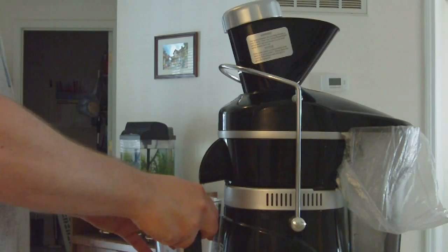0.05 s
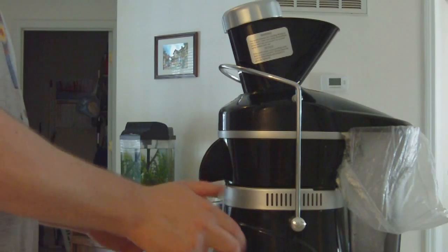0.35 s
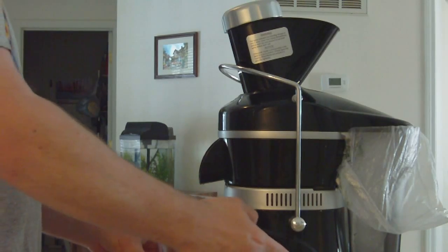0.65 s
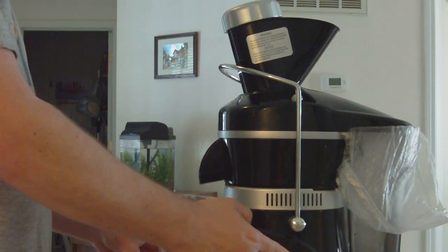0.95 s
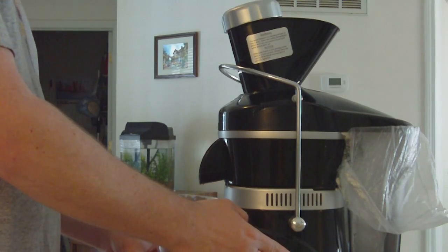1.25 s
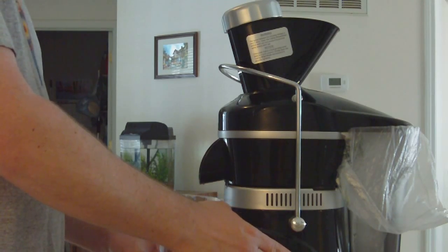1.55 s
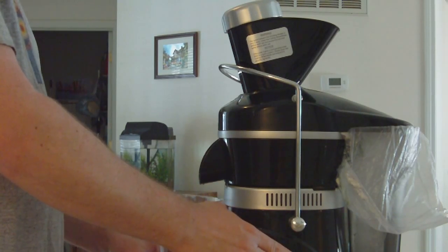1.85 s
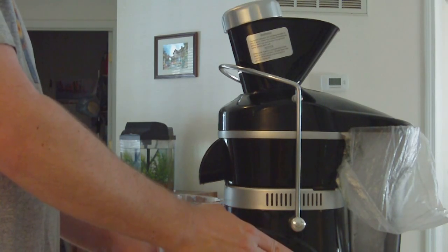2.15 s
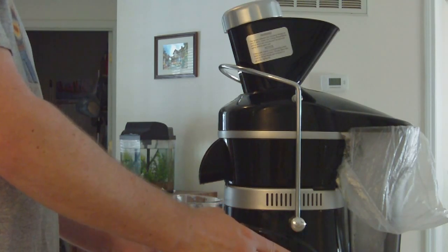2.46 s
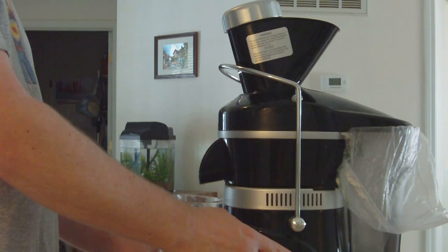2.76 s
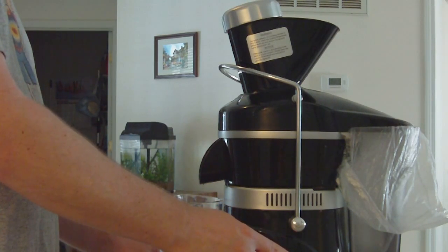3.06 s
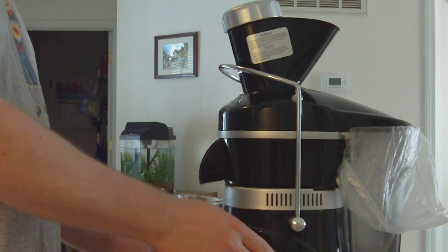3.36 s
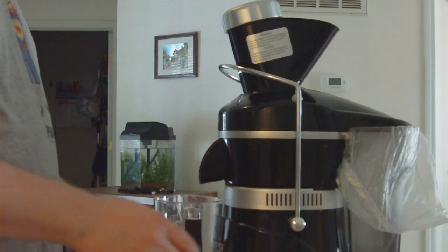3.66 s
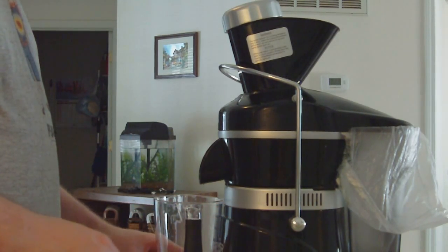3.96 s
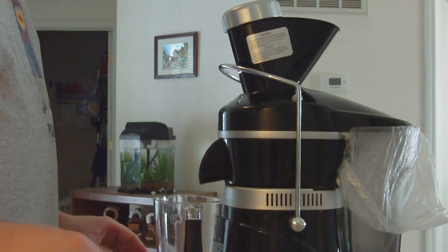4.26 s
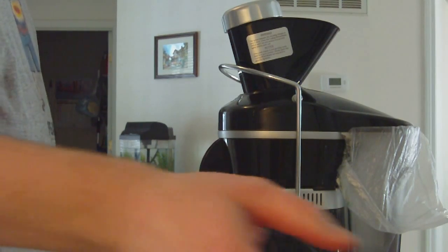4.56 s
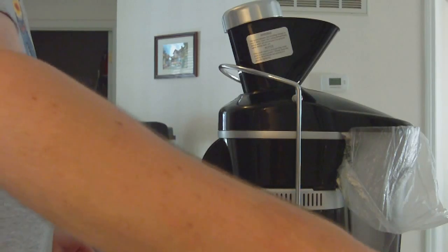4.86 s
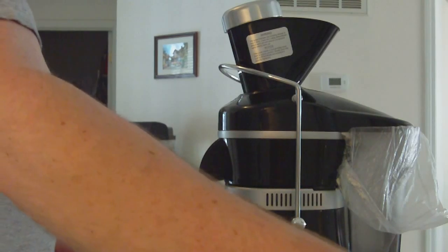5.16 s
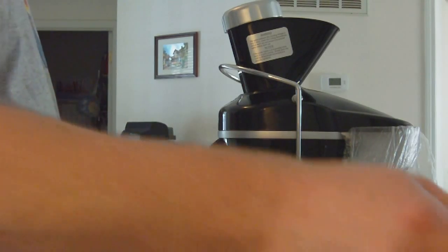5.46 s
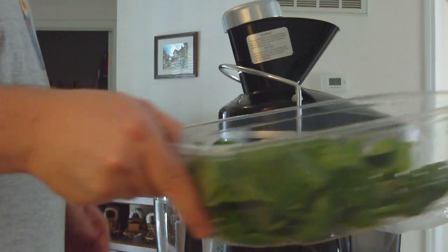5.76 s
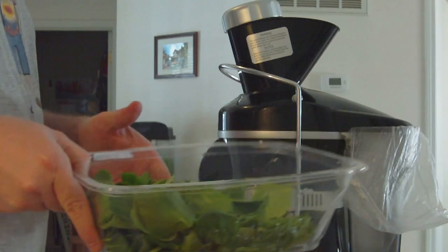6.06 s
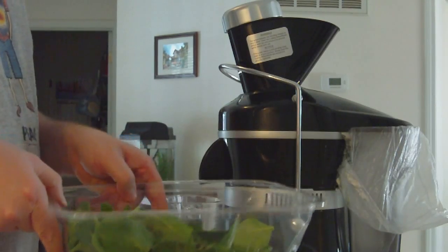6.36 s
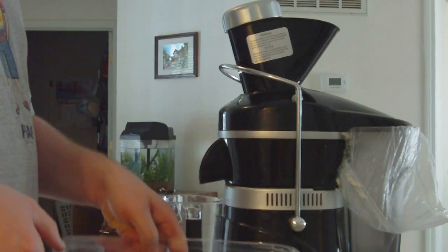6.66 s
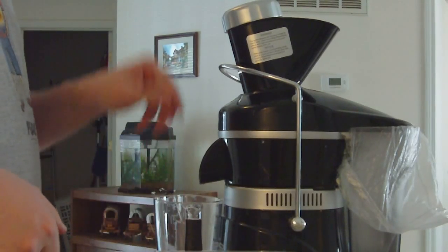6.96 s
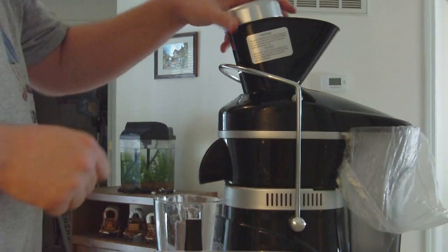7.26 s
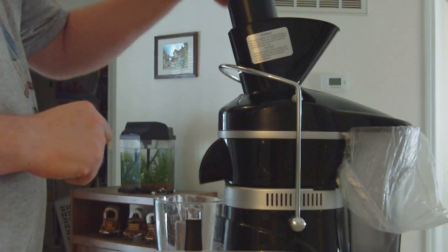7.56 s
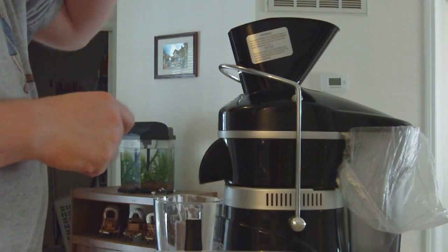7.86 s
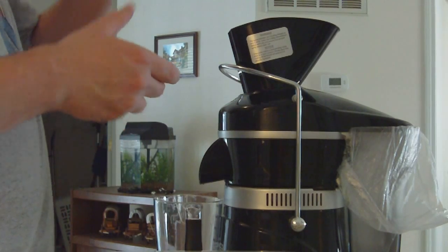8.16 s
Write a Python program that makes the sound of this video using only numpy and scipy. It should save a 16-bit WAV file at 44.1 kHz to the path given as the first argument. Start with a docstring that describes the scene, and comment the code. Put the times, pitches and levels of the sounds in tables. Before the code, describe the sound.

In a quiet kitchen, a jug knocks a few times into place. After a pause a switch snaps and a juicer motor groans up to speed, settling into a steady whir of hum, whine, rushing air and light rattle, with brief scraping at first. Near the end a plastic tub bumps onto the counter and the pusher rubs and knocks out of the chute. One small microphone picks it up from nearby.

```python
"""A centrifugal juicer in a quiet kitchen, heard from nearby on one small microphone.
A jug is knocked into place. At 2.2 s the switch snaps and the induction motor groans up through the
resonances of its housing to just under 60 turns a second. It runs on with hum, whine, rushing air and a
light rattle, the basket grazing the lid at first. An arm, then a plastic tub, passes between machine and
microphone; at 6.7 s the tub is set down, and by 7.6 s the pusher is drawn out of the chute."""
import sys
import numpy as np
from scipy import signal
from scipy.fft import rfft, irfft, next_fast_len
from scipy.io import wavfile
from scipy.ndimage import uniform_filter1d, map_coordinates

SR = 44100
rng = np.random.default_rng(int(sys.argv[2]) if len(sys.argv) > 2 else 0)


def dump(signal):
    """Clip the signal to [-1, 1] and save it as 16-bit WAV at the path in sys.argv[1]."""
    limited = np.clip(np.atleast_2d(signal).T, -1, 1)
    pcm = np.round(limited * 32767).astype(np.int16)
    wavfile.write(sys.argv[1], SR, pcm)


N = 362061
TIME = np.arange(N) / SR
GRIP_S, PUSHER_OUT_S = 6.9, 7.63

# the motor gathers speed: time_s, speed_hz
SHAFT_SPEED = [(2.162, 1), (2.35, 26), (2.58, 32.5), (2.625, 37.5), (2.645, 47.5), (2.72, 56),
               (2.8, 59.815)]
FULL_SPEED_S, FULL_SPEED_HZ = SHAFT_SPEED[-1]

def shaft():
    """The turning shaft: its angle in radians and its pace as a share of full speed."""
    speed = curve(SHAFT_SPEED) * (TIME > SHAFT_SPEED[0][0])
    angle = 2 * np.pi * np.cumsum(speed * (1 + 0.00018 * drift(2))) / SR
    return angle, speed / FULL_SPEED_HZ


# resonances of the housing and of the metal basket: pitch_hz, width_hz, level_db
HOUSING_MODES = [(530, 59, 0), (673, 190, -6), (920, 114, -1), (1110, 65, -4.5), (1240, 90, -15)]
BASKET_MODES = [(1692, 130, 1.5), (1930, 70, -7), (2013, 50, 3), (2470, 130, 0), (3000, 140, 0),
                (3350, 110, -1), (3690, 89, -3.5)]
# shudders of the housing and squeals of the basket: peak_s, half_length_s, level_db
HOUSING_SHUDDERS = [(2.25, 0.045, -34), (2.372, 0.045, -27.5), (2.447, 0.017, -21.5), (2.51, 0.038, -17.5),
                    (2.587, 0.04, -16.5), (2.672, 0.056, -17)]
BASKET_SQUEALS = [(2.646, 0.0087, -20), (2.684, 0.015, -24.5), (2.675, 0.063, -29.5)]

def run_up(angle, slots=18, sideband_db=-7, scrape_db=4):
    """The motor's slot tone, its sidebands and its multiples sweep through housing and basket."""
    def swept(drive, modes):
        drive = unit(drive) + amp(scrape_db) * rng.standard_normal(N)
        rung = colour(drive, lambda hz: resonances(modes, hz))
        return rung / np.sqrt(abs(uniform_filter1d(rung ** 2, size=900)) + 1e-9)  # level held even
    angle = angle + .035 * drift(45)  # the shaft judders under the starting torque
    sidebands = sum(np.cos((slots + k) * angle + 2 * np.pi * rng.random())
                    for k in (-2, -1, 1, 2, 4, 6, 9, 12))
    groan = swept(np.cos(slots * angle) + amp(sideband_db) * sidebands, HOUSING_MODES)
    squeal = swept(sum(np.cos(k * slots * angle) / (k - 1) for k in range(2, 5)), BASKET_MODES)
    shudder = surges(HOUSING_SHUDDERS)
    return groan * shudder + squeal * (surges(BASKET_SQUEALS) + amp(-23) * shudder)


# tones locked to the shaft: multiple (rounded when played), pusher_in_db, chute_open_db
SHAFT_ORDERS = [(4, -49.5, -44.5), (5, -52.5, -50), (6, -55, -59), (7, -57, -63), (8, -53, -49),
                (9, -44.5, -43), (10, -44, -43), (11, -60.5, -62), (12, -63.5, -56), (13, -52.5, -53),
                (15, -47, -46), (16, -58, -53), (18, -52, -56), (20, -51, -52), (22, -50, -56),
                (23, -62.5, -50), (26, -51, -58), (70, -67.5, -59), (69.1, -56.5, -53), (70.9, -59, -55),
                (71.73, -46.5, -47.5), (73.3, -57, -54)]
# the bearings at full speed: pitch_hz, level_db
BEARING_WHINE = [(3148, -64), (3170, -58.5), (3188, -47.5), (3226, -41), (3263, -46), (3286, -49),
                 (3333, -51), (3810, -52)]

def motor_tones(angle, pace):
    """Shaft orders and bearing whine, each wavering in strength and phase."""
    def tone(phase, depth, rate_hz):
        wavering = (1 + depth * drift(rate_hz)) * np.cos(phase)
        return np.sqrt(2) * (wavering + depth * drift(rate_hz) * np.sin(phase))
    opened = chute_open()
    _, shade_db = shade()
    orders = sum((amp(shut_db) * (1 - opened) + amp(open_db) * opened) * tone(round(k) * angle, .2, 9)
                 for k, shut_db, open_db in SHAFT_ORDERS)
    whine = sum(amp(db) * tone(hz / FULL_SPEED_HZ * angle, 0.31, 14) for hz, db in BEARING_WHINE)
    return (orders + whine * amp(shade_db)) * pace ** 4


# resonances of the lid and of the panels: pitch_hz, width_hz, level_db
LID_MODES = [(199, 29, -11), (242.7, 34, -6.5), (262.4, 20, 1.5), (298.4, 39, -1), (350, 49, -11)]
PANEL_MODES = [(538, 80, 0.5), (608, 87, -5), (849, 57, 0), (916, 54, -2), (982, 52, -1), (1120, 61, -2.5),
               (1364, 92, -4), (1517, 90, -6), (1686, 100, -6.5), (1970, 150, -12), (2540, 170, -13.5),
               (3470, 370, -13.5), (3790, 66, -13.5), (4470, 220, -17.5), (5380, 110, -16)]
# the broad part of the rattle: frequency_hz, density_db
RATTLE_SPECTRUM = [(100, -34), (400, 0), (800, 0.5), (1250, -9), (2500, -7), (3600, -10.5), (5000, -23),
                   (7000, -33)]
# how hard the basket rattles: time_s, strength_db
BASKET_SHAKING = [(2.85, -31), (3.05, -30), (3.78, -31.5), (3.83, -33), (4.66, -32), (4.68, -29.5),
                  (4.89, -32.5), (4.93, -27.5), (4.98, -31), (6.0, -30.5), (6.47, -34.5), (6.53, -29),
                  (6.6, -32), (6.97, -35), (7.59, -29.5), (7.688, -33.5), (8.018, -36.5), (8.17, -37.5)]

def basket_rattle(angle, pace, usual_db=-31, lid_db=-36, panels_db=-32, draw_db=5.5):
    """The spinning basket shakes lid and panels; the lid drums louder while the pusher is drawn up."""
    drum = colour(rng.standard_normal(N), lambda hz: resonances(LID_MODES, hz))
    taps = rng.standard_normal(N) * amp(3 * drift(300) + 0.55 * drift(12))  # grain and flutter
    taps *= 1 + 0.071 * np.cos(angle)  # a throb on each turn
    rattle = colour(taps, lambda hz: np.hypot(resonances(PANEL_MODES, hz),
                                              amp(-8.5 + spectrum(RATTLE_SPECTRUM, hz))))
    shaking_db = curve(BASKET_SHAKING) - usual_db
    drawn = np.clip((TIME - GRIP_S) / (PUSHER_OUT_S - GRIP_S), 0, 1) * (1 - chute_open())
    lid_gain = amp(lid_db + 0.46 * shaking_db + draw_db * drawn) * pace ** 0.46
    panel_gain = amp(panels_db + 1.5 * shaking_db) * pace ** 1.3
    return drum * lid_gain + rattle * np.hypot(panel_gain, amp(-10.5) * surges(HOUSING_SHUDDERS))


# air at the spout: frequency_hz, density_db
AIR_SPECTRUM = [(20, -3), (60, 2), (130, 2), (200, 2), (420, 3.5), (700, 7.5), (1800, 4), (3400, 4.5),
                (4400, 3), (5600, -0.5), (6300, 0.5), (7000, -7)]

def air_rush(angle, pace, level_db=-31, ease_db_per_s=0.45):
    """The basket fans air through the spout; the rush eases as the machine runs on."""
    pulsing = rng.standard_normal(N) * (1 + 0.049 * np.cos(angle))
    air = colour(pulsing, lambda hz: amp(spectrum(AIR_SPECTRUM, hz)))
    shade_db, _ = shade()
    return air * amp(level_db + shade_db - ease_db_per_s * (TIME - FULL_SPEED_S)) * pace ** 3.6


def unbalance(angle, level_db=-39.5, start_s=2.74, build_s=.17):
    """The off-centre basket hums at the shaft rate, dips as the pusher comes free, then stays stronger."""
    build = 1 - np.exp(-np.maximum(TIME - start_s, 0) / build_s)
    db = level_db - 12 * swell(PUSHER_OUT_S, .05) + 2 * chute_open()
    return np.sqrt(2) * build * amp(db) * np.cos(angle)


def windings(angle, pace, hum_hz=120.06, in_step_s=5.8, mains_db=-46, shaft_db=-49, open_db=-5.5):
    """Hum at twice the mains rate; the rotor slips, so its second order beats slowly against it."""
    mains = np.cos(2 * np.pi * hum_hz * (TIME - in_step_s) + 2 * angle[round(in_step_s * SR)])
    hum = amp(mains_db) * mains * (pace > 0) + amp(shaft_db) * np.cos(2 * angle) * pace ** 4
    return hum * amp(open_db * chute_open())


# spells of the basket touching the lid: start_s, end_s, level_db
GRAZE_SPELLS = [(3.034, 3.34, -31.5), (3.402, 4.403, -45.5)]

def graze(angle, decay_turns=0.22, attack_s=.006, release_s=.04):
    """The basket scrapes the lid once a turn for as long as a spell lasts."""
    out, noise = np.zeros(N), contact_noise(hardness=0.77, count=N)
    for start, end, db in GRAZE_SPELLS:
        turns = (angle - angle[round(start * SR)]) / (2 * np.pi)
        spell = np.clip((TIME - start) / attack_s, 0, 1) * np.exp(-np.maximum(TIME - end, 0) / release_s)
        out += amp(db) * spell * unit(noise * np.exp(-(turns % 1) / decay_turns) * (angle > 0))
    return out


def chute_open(opening_s=.05):
    """0 while the pusher is in the chute, 1 once it is out."""
    return np.clip((TIME - PUSHER_OUT_S) / opening_s, 0, 1)


# an arm, then the tub, passes in front of the microphone: peak_s, half_length_s, air_db, whine_db
PASSING_SHADOWS = [(5.02, .5, -2, -5), (6.1, 0.18, -0.6, -6.5)]

def shade():
    """Dips in dB of the air and of the whine while something screens the machine."""
    return sum(np.outer([air_db, whine_db], swell(s, half_length))
               for s, half_length, air_db, whine_db in PASSING_SHADOWS)


# knocks and clicks at the machine: start_s, level_db, hardness, rise_s, decay_s, room_db, crack_db
KNOCKS = [(.087, -13.5, 0.19, 0.0017, 0.0084, -10, -23), (0.185, -17.5, 0.57, 0.00081, 0.018, -9, -1),
          (.303, -17.5, 0.12, 0.0016, 0.023, -5, -16), (.401, -41, 0.53, 0.0018, 0.0089, -10, -18),
          (.445, -42, 0.5, 0.0016, 0.017, -14, -11), (2.161, -8.5, 0.99, 0.0037, 0.0082, -5, -12),
          (2.448, -24.5, 0.5, 0.0029, 0.0068, -18, -8), (5.23, -28.5, 1, 0.0018, .005, -18, -11),
          (7.426, -26, 0.96, .002, 0.0087, -16, -11)]
# the struck housing: pitch_hz, level_db, t60_s
HOUSING_RING = [(313, -22, .1), (563, 4, 0.27), (724, 1, 0.097), (823, 8, 0.084), (1233, -4, 0.14)]

def knocks(room_t60_s=0.38, ring_db=-7, crack_s=0.0032):
    """Each knock is a hard crack, a short burst, a ring of the housing and the kitchen's tail."""
    out, t = np.zeros(N), np.arange(SR // 2) / SR
    ring = sum(amp(db - 60 * t / t60) * np.sin(2 * np.pi * hz * t) for hz, db, t60 in HOUSING_RING)
    for s, db, hardness, rise, decay, room_db, crack_db in KNOCKS:
        crack = contact_noise(1.0, len(t)) * amp(crack_db) * np.exp(-t / crack_s)
        burst = contact_noise(hardness, len(t)) * np.exp(-np.maximum(t - 2 * rise, 0) / decay)
        tail = contact_noise(hardness, len(t)) * amp(room_db - 60 * t / room_t60_s)
        body = burst + tail + (1 - hardness) * amp(ring_db) * ring
        add(out, s, amp(db) * (crack + np.minimum(t / rise, 1) * body))
    return out


# the thin tub on the counter, the pusher in the chute: start_s, level_db, decay_s
TUB_HITS = [(6.665, -19, 0.019), (6.777, -20.5, 0.035), (6.797, -24.5, 0.019), (6.836, -25.5, 0.019)]
PUSHER_HITS = [(7.426, -22, 0.012), (7.512, -27.5, .014), (7.532, -30, 0.013), (7.592, -26, 0.012),
               (7.615, -25, 0.012)]
# the hollow tub, the chute's air column and wall: pitch_hz, width_hz, level_db
TUB_MODES = [(111, 110, -8), (328, 110, -2.5), (856, 130, 2.5), (1500, 200, -5), (1730, 90, -10),
             (2190, 280, -15)]
CHUTE_MODES = [(255, 53, 1), (850, 170, -15), (2380, 640, -9.5), (3500, 810, -18), (5130, 1800, -21.5)]

def bumps(hits, modes, rise_s=.002):
    """Hollow bumps: short bursts in the resonances of a plastic shell."""
    out, t = np.zeros(N), np.arange(SR // 4) / SR
    for s, db, decay in hits:
        hollow = colour(rng.standard_normal(len(t)), lambda hz: resonances(modes, hz))
        add(out, s, amp(db) * hollow * np.minimum(t / rise_s, 1) * np.exp(-t / decay))
    return out


# handling around the machine: start_s, end_s, level_db, hardness
SLIDES = [(-.1, .12, -48.5, 0.72), (0.736, .83, -52, 1), (6.679, 6.87, -27.5, 0.78),
          (7.48, 7.55, -32.5, .7), (7.568, 7.662, -33.5, 0.78)]

def rubs(grain_db=1.0):
    """Plastic and hands rub in short uneven slides."""
    out = np.zeros(N)
    grain = unit(amp(grain_db * drift(83)))
    for start, end, db, hardness in SLIDES:
        inside = (TIME > start) & (TIME < end)
        arch = np.sqrt(np.sin(np.pi * (TIME[inside] - start) / (end - start)))
        out[inside] += amp(db) * arch * contact_noise(hardness, inside.sum())
    return out * grain


# a dull contact and a sharp one: frequency_hz, density_db
DULL_SPECTRUM = [(55, -41), (100, -20), (180, -25), (380, -8.5), (455, -17), (570, -1.5), (680, -14.5),
                 (845, -9.5), (1030, -15.5), (1720, -19), (2200, -27.5), (3300, -27), (7000, -39)]
SHARP_SPECTRUM = [(24, -39), (40, -2), (140, -22), (262, -13.5), (431, -21.5), (842, -14.5), (938, -9.5),
                  (1240, -11.5), (1580, -12), (1760, -6), (2890, -3.5), (5400, 1.5), (7000, -5.5),
                  (9100, -37), (15400, -120)]

def contact_noise(hardness, count):
    """Noise of a contact, from dull and soft (hardness 0) to sharp and hard (1)."""
    def gain(hz):
        return amp((1.5 - hardness) * spectrum(DULL_SPECTRUM, hz) + hardness * spectrum(SHARP_SPECTRUM, hz))
    return colour(rng.standard_normal(count), gain)


# room tone at the microphone: frequency_hz, density_db
KITCHEN_SPECTRUM = [(20, -11.5), (55, -5.5), (100, -9), (200, -9), (500, -9.5), (1000, -12.5), (2000, -15),
                    (4000, -17), (7000, -21.5)]

def room_tone(level_db=-50):
    """The still kitchen: a faint, steady noise behind everything."""
    return amp(level_db) * colour(rng.standard_normal(N), lambda hz: amp(spectrum(KITCHEN_SPECTRUM, hz)))


def amp(db):
    """Decibels to gain."""
    return 10 ** (np.asarray(db) / 20)


def unit(x):
    """Scales to rms 1."""
    return x / np.sqrt(np.mean(x ** 2) + 1e-20)


def curve(rows):
    """A time table's value at every sample."""
    return np.interp(TIME, *np.transpose(rows))


def spectrum(points, hz):
    """A spectrum in dB, joined on a log-frequency axis."""
    f, db = np.transpose(points)
    return np.interp(np.log(hz + 1), np.log(f + 1), db)


def resonances(modes, hz):
    """Gain of a set of resonances with steep skirts."""
    return np.sqrt(sum(amp(db) ** 2 / (1 + ((hz - f) / (0.56 * width)) ** 2) ** 2
                       for f, width, db in modes))


def colour(x, gain):
    """Filters x by a gain given as a function of frequency; rms 1."""
    size = next_fast_len(len(x) + 2048)
    return unit(irfft(rfft(x, size) * gain(np.fft.rfftfreq(size, 1 / SR)), size)[:len(x)])


def drift(rate_hz):
    """A smooth random wander of rms 1."""
    knots = rng.standard_normal(4096)
    coarse = map_coordinates(knots, [TIME[::64] * rate_hz * 2], order=3, mode="wrap")
    return unit(np.interp(TIME, TIME[::64], coarse))


def swell(s, half_length):
    """A bell-shaped rise and fall of height 1 around time s."""
    return np.exp(-((TIME - s) / half_length) ** 2)


def surges(rows):
    """Gain of a series of swells."""
    return sum(amp(db) * swell(s, half_length) for s, half_length, db in rows)


def add(mix, s, sound):
    """Mixes a sound in at time s."""
    part = mix[round(s * SR):][:len(sound)]
    part += sound[:len(part)]


def scene():
    """The juicer in front, the handling around it and the kitchen behind, in mono."""
    angle, pace = shaft()
    kitchen = room_tone()
    motor = windings(angle, pace) + run_up(angle) + motor_tones(angle, pace)
    basket = unbalance(angle) + basket_rattle(angle, pace) + air_rush(angle, pace) + graze(angle)
    handling = knocks() + bumps(TUB_HITS, TUB_MODES) + bumps(PUSHER_HITS, CHUTE_MODES) + rubs()
    return (motor + basket + handling + kitchen)[None]


def record(dry):
    """A small camera's microphone: soft overload on the loudest peaks, then a steep treble cut."""
    ceiling, edge_hz = .85, 7130
    lowpass = signal.firwin(401, edge_hz, window=("kaiser", 8), fs=SR)
    return signal.oaconvolve(ceiling * np.tanh(dry / ceiling), lowpass[None], "same")


dry = scene()
out = record(dry)
dump(out)
```